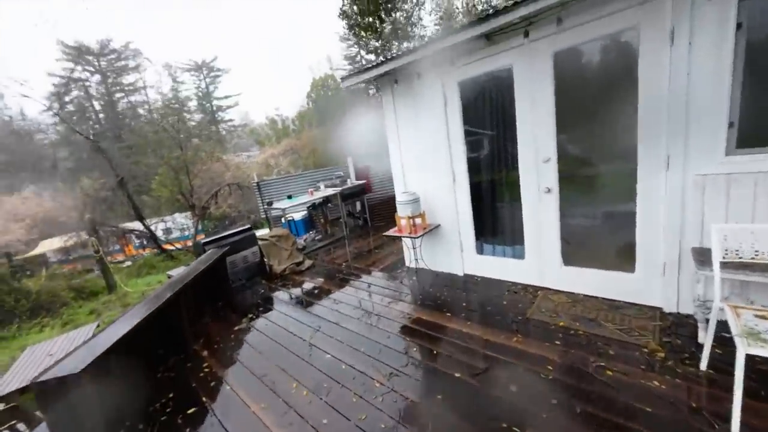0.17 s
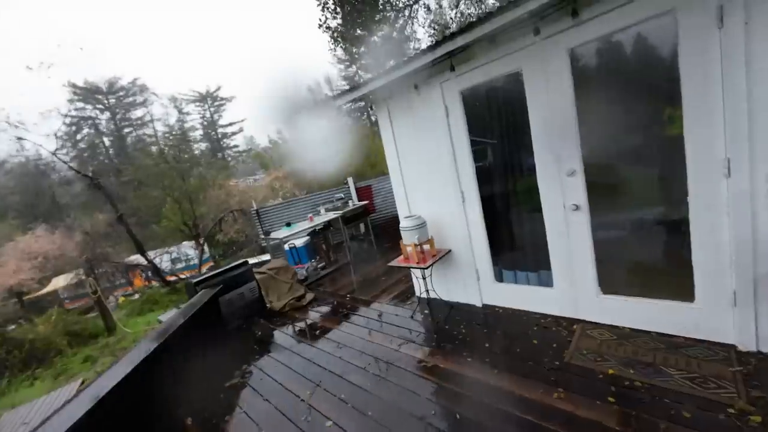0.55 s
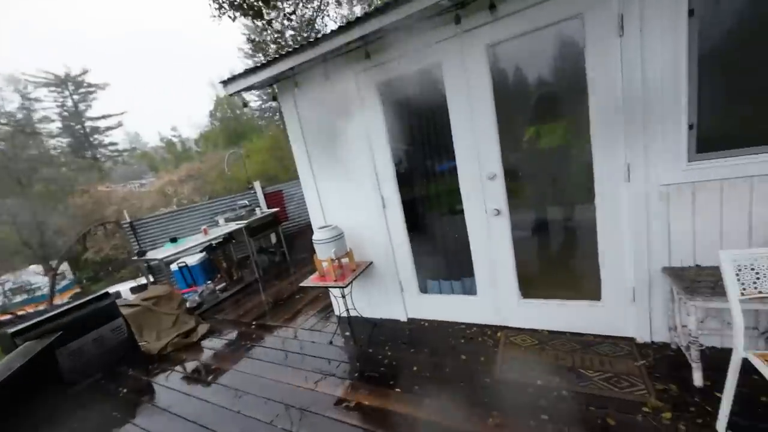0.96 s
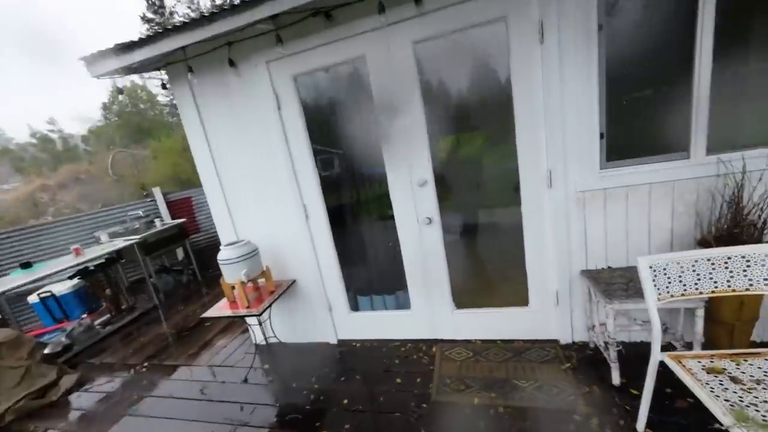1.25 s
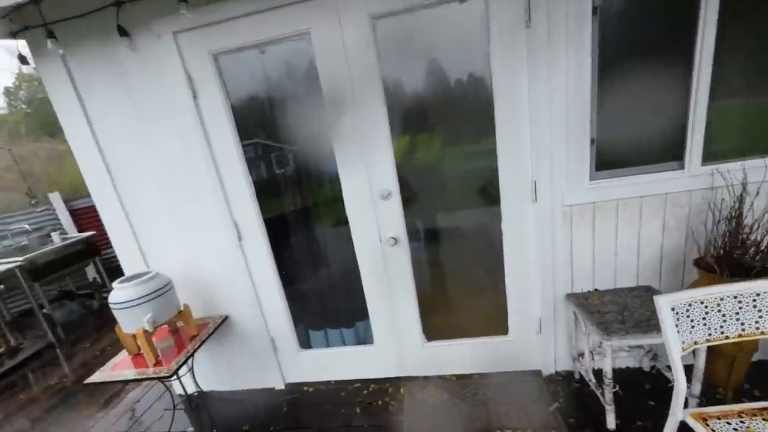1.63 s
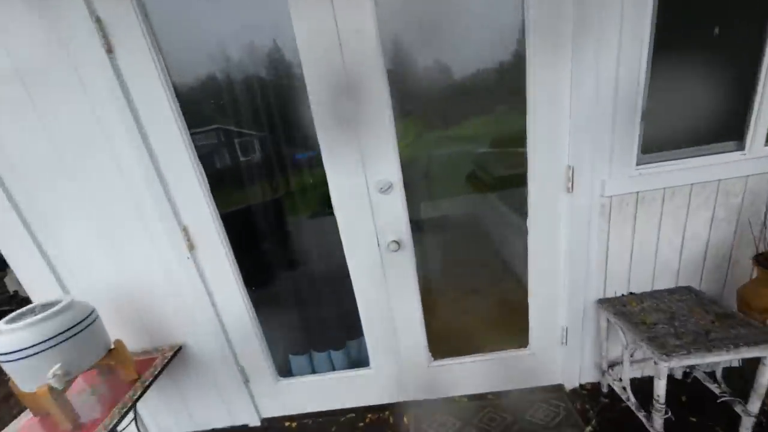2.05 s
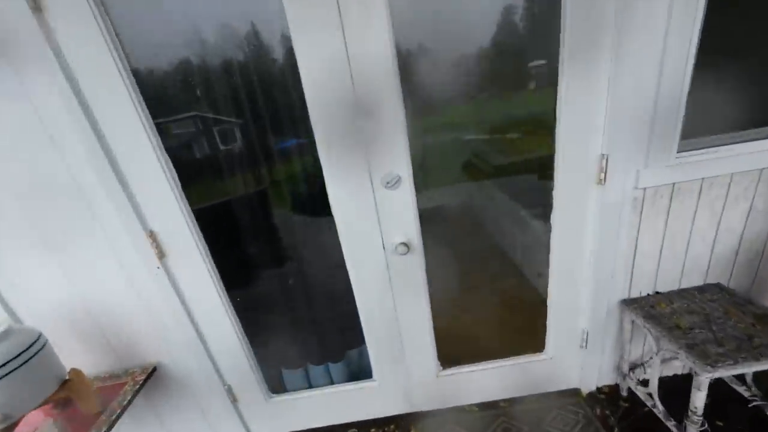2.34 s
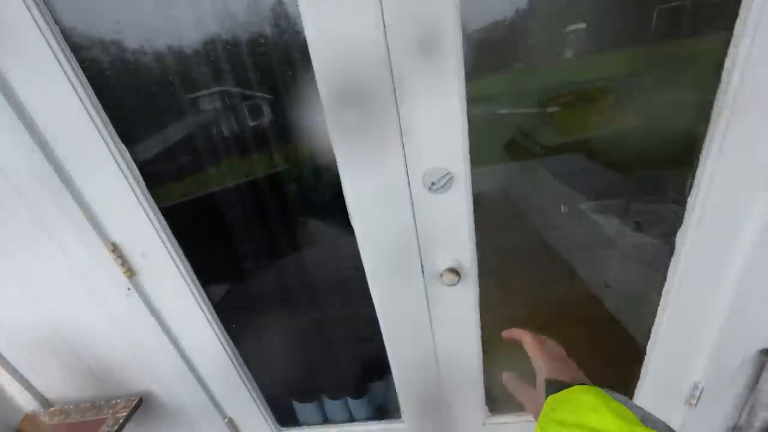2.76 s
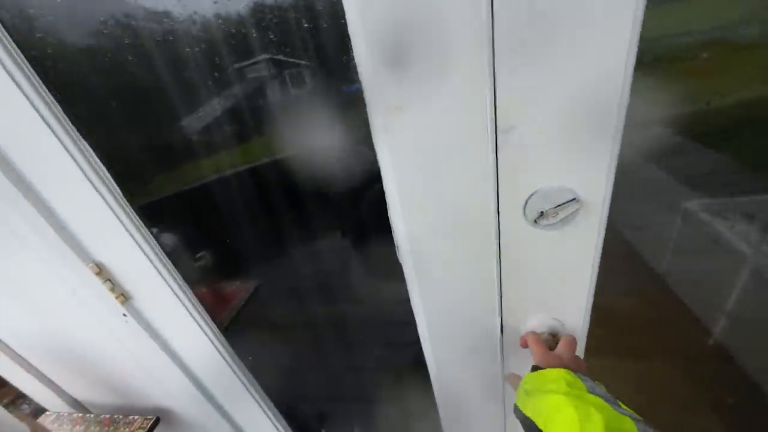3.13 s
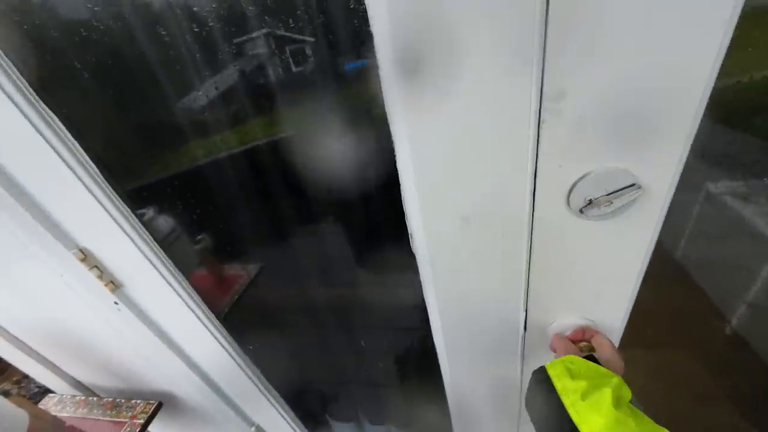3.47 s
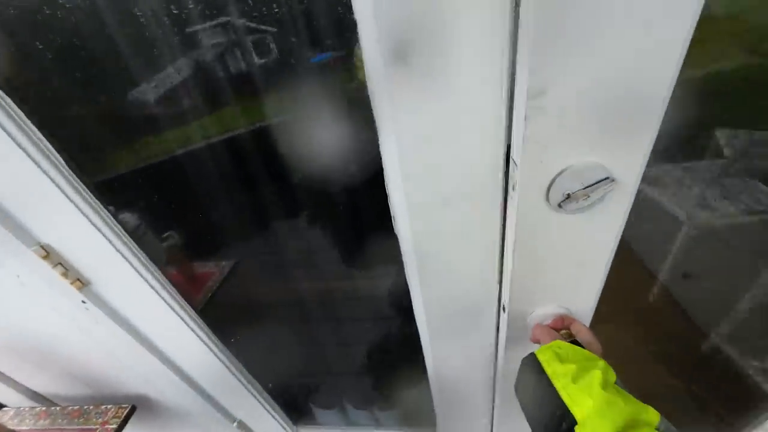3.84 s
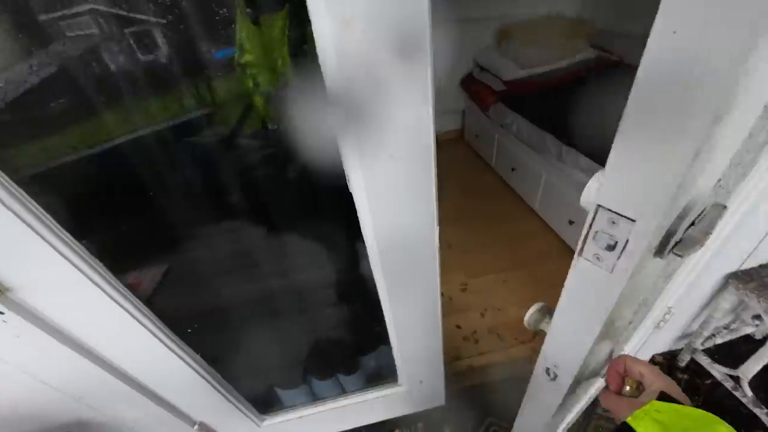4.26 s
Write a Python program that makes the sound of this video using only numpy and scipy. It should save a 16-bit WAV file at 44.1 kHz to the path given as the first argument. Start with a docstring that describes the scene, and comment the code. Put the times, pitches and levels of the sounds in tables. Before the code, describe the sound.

Outdoors on a wet wooden deck, steady rain hisses with splats and small plinks. A person in a wet jacket takes soft, low thumping steps, with brief sole scuffs and cloth rustle, while near drops tick. The knob and latch click, then a tight door judders from its frame. The carried, wet microphone sounds dull, with air rumble and rubbing at each step.

```python
"""Rain on a wooden deck, and a door

Steady rain hisses, splats and plinks: shaped noise, random impulses and short fading tones.
Someone walks over the wet boards to a door: struck tones thump, and swells of rough noise scuff and rustle.
Near drops tick, the knob and latch click, and the door rubs out of its frame in a run of uneven slips.
The microphone is wet and hears little treble; its air noise and rubbing mount are heard too.
"""
import sys
import numpy as np
from scipy import signal
from scipy.fft import rfft, irfft, next_fast_len
from scipy.io import wavfile
from scipy.ndimage import map_coordinates

SR = 44100
rng = np.random.default_rng(int(sys.argv[2]) if len(sys.argv) > 2 else 0)


def wrap_up_sound(samples):
    """Save the sound to the file named by the first command line argument, as 16-bit audio."""
    columns = np.atleast_2d(samples).T
    # keep every value between -1 and 1, then stretch to whole-number steps
    tamed = np.clip(columns, -1, 1)
    steps = np.round(tamed * 32767).astype(np.int16)
    wavfile.write(sys.argv[1], SR, steps)


N = 194084
TIME = np.arange(N) / SR  # seconds since the start
AGE = TIME[:SR // 3]  # seconds since a blow

# tone of drops on wet boards and of creasing cloth: f/Hz, level/dB
SWISH = [(300, -12), (900, -1), (1700, -6), (2400, -1.5), (3200, -1), (4200, -14.5), (6500, -33),
         (12000, -64.5), (16000, -92.5)]
# tone of short sounds through the wet microphone opening: f/Hz, level/dB
WET_PORT = [(30, -10), (300, 0), (3200, 6.5), (4200, 1), (6500, -25.5), (12000, -42), (16000, -57)]
# footfalls: t/s, level/dB, board pitch f/Hz, ring t60/s, knock level/dB (relative), knock pitch f/Hz
STEPS = [(.229, -22.5, 99, 0.065, -7, 201), (0.386, -27.5, 98, 0.078, -11, 218),
         (0.829, -24.5, 105, 0.14, -12.5, 235), (0.953, -36, 110, 0.098, -2.5, 234),
         (1.373, -38.5, 117, 0.025, -5, 257), (1.504, -36.5, 166, 0.06, -4, 333),
         (1.981, -27, 100, 0.057, -3, 256), (2.156, -21.5, 96, 0.059, -6.5, 244),
         (2.405, -38, 83, 0.19, -14, 260), (2.666, -22, 95.7, 0.086, -9, 228),
         (3.410, -22, 82, 0.06, -0.5, 238), (4.09, -26.5, 89, 0.11, -3.5, 249),
         (4.349, -24.5, 98.5, 0.052, -8, 204)]

PUSH_S, FREE_S, CLEAR_S = 4.097, 4.243, 4.272  # the door is pushed, breaks free, and clears its frame
SWING = np.clip((TIME - PUSH_S) / 0.15, 0, 1)  # speed of door and arm, 0-1, reached in 0.15 s


def amp(db):
    """Turn decibels into a gain."""
    return 10 ** (np.asarray(db) / 20)


def unit(x):
    """Scale to an average strength (rms) of 1."""
    return x / np.sqrt(np.mean(x ** 2) + 1e-20)


def crest(x):
    """Scale to a peak of 1."""
    return x / np.abs(x).max()


def along(points, hz):
    """Read between (Hz, value) points on a log pitch axis."""
    f, v = np.transpose(points)
    return np.interp(np.log(hz + 1), np.log(f + 1), v)


def wobble(rate):
    """A smooth random curve with rate knots a second."""
    knots = rng.standard_normal(int(N * rate / SR) + 4)
    return map_coordinates(knots, [TIME * rate])


def filtered(x, response):
    """Multiply the spectrum of x by a function of frequency."""
    m = next_fast_len(N + SR // 2)
    return irfft(rfft(x, m) * response(np.fft.rfftfreq(m, 1 / SR)), m)[:N]


def colour(x, spectrum):
    """Give x a tone from (Hz, dB) points, with a filter that never sounds before its input."""
    size = 8192
    gain = amp(along(spectrum, np.fft.rfftfreq(size, 1 / SR)))
    # folding the cepstrum moves the filter's whole response to after the input
    cepstrum = irfft(np.log(gain))
    cepstrum[1:size // 2] *= 2
    cepstrum[size // 2 + 1:] = 0
    return signal.fftconvolve(x, irfft(np.exp(rfft(cepstrum))))[:N]


def resonate(x, peaks):
    """Send x through (Hz, width Hz, dB) resonances and a soft contact that dulls the treble, at rms 1."""
    # tone of the soft contact: f/Hz, level/dB
    soft_contact = [(1500, 3.5), (3200, -4), (4500, -18), (8000, -35), (14000, -56)]

    def body(f):
        total = 0
        for k, (centre, width, db) in enumerate(peaks):
            resonance = 1j * f * width / (centre * centre - f * f + 1j * f * width)
            total = total + (-1) ** k * amp(db) * resonance  # neighbours have opposite signs
        return total

    return unit(colour(filtered(x, body), soft_contact))


def fade(t60):
    """Die away by 60 dB in t60 seconds."""
    return np.exp(-np.log(1000) * AGE / t60)


def ring(modes):
    """Strike (Hz, dB, t60) tones, a little different at each blow, and scale to peak 1."""
    total = 0
    for hz, db, t60 in modes:
        level = amp(db + rng.normal(0, 1))
        pitch = hz * (1 + rng.normal(0, .02))
        total = total + level * fade(t60) * np.sin(2 * np.pi * pitch * AGE)
    return crest(total)


def impacts(rate, spread_db):
    """Impulses of uneven size at random times, about rate a second, at rms 1."""
    size = amp(spread_db * np.minimum(rng.standard_normal(N), 2))
    hits = rng.random(N) < rate / SR
    return unit(hits * size * np.sign(rng.standard_normal(N)))


def add(track, s, sound):
    """Mix a sound into the track at s seconds."""
    part = track[round(s * SR):][:len(sound)]
    part += sound[:len(part)]  # part is a view, so the track changes too


def strokes(rows):
    """Bell-shaped swells from (s, dB, half length s) rows."""
    return sum(amp(db) * np.exp(-.5 * ((TIME - s) / half) ** 2) for s, db, half in rows)


def after(s):
    """A soft switch from 0 to 1 around s seconds, over a few milliseconds, so that the rubbing changes smoothly."""
    return .5 + .5 * np.tanh((TIME - s) / 0.002)


def patter(count, centre_hz, spread_db):
    """Drops at random times, each ringing a few cycles at its own pitch, at rms 1."""
    when, life = rng.random((2, count, 1))
    pitch, size = np.clip(rng.standard_normal((2, count, 1)), -2, 2)
    t = AGE[:SR // 50]
    cycles = centre_hz * np.exp(.45 * pitch) * t
    decay = np.exp(-cycles / (0.72 + 5 * life ** 2))
    grains = amp(spread_db * size) * np.sin(2 * np.pi * cycles) * decay
    where = (when * N).astype(int) + np.arange(len(t))
    track = np.bincount(where.ravel(), grains.ravel(), N)[:N]
    return unit(colour(track, WET_PORT))


def rain():
    """Far drops merge into a hiss; nearer ones splat on the wet boards and plink in the puddles."""
    # tone of the far rain: f/Hz, level/dB
    far_tone = [(30, -14), (100, 4), (400, -2.5), (650, -8), (1100, -7), (1900, -13.5), (2500, -8.5),
                (3250, -8), (4000, -19.5), (5000, -27), (6500, -36), (8200, -43), (10000, -50.5),
                (13000, -59)]
    far = unit(colour(rng.standard_normal(N), far_tone)) * amp(1.02 + 0.62 * wobble(9))
    falls = impacts(rate=750, spread_db=4.5)
    splats = unit(colour(falls, SWISH)) * amp(-4.5 + 0.8 * wobble(17))
    plinks = patter(count=1600, centre_hz=2372, spread_db=4) * amp(-6.5)
    drifting_gain = amp(-52 + 0.28 * wobble(2))
    return drifting_gain * (far + splats + plinks)


def jolts():
    """Each footfall shakes the carried microphone: a quick rise and a slower fall."""
    rise_s, fall_s = 0.024, 0.11  # time constants
    out = np.zeros(N)
    for s, db, *_ in STEPS:
        age = np.maximum(TIME - s, 0)
        out += amp(db) * (1 - np.exp(-age / rise_s)) * np.exp(-age / fall_s)
    return out


def handling():
    """Air rumbles at the microphone and its mount rubs, more after each footfall and as the door swings."""
    # tone of the moving air: f/Hz, level/dB
    rumble_tone = [(12, -14.5), (30, 3), (80, -1.5), (130, -8.5), (250, -20), (500, -34), (1500, -72),
                   (4000, -120)]
    # tone of the rubbing mount: f/Hz, level/dB
    rub_tone = [(80, -8), (200, 4.5), (500, 4), (900, -6.5), (1600, -13), (4000, -50.5), (10000, -120)]
    # puffs of air on the microphone: t/s, level/dB, half length/s
    puffs = [(.61, -46, 0.029), (1.33, -47, 0.017), (3.52, -41, .04), (3.9, -48.5, 0.15)]
    jolt = jolts()
    # each sum: being carried, shaken by footfalls, moved with the door
    air = amp(-54.5) + amp(-19.5) * jolt + amp(-38) * SWING + strokes(puffs)
    strain = amp(-59) + amp(-33) * jolt + amp(-45.5) * SWING
    rumble = air * amp(1.7 * wobble(14)) * unit(colour(rng.standard_normal(N), rumble_tone))
    rubbing = unit(colour(impacts(rate=900, spread_db=5.5), rub_tone))
    return rumble + strain * amp(2.3 * wobble(25)) * rubbing


def scuffs():
    """A rubber sole slips on the wet boards in short bursts, or drags dully over them."""
    # sole slips: t/s, level/dB
    slip_rows = [(0.218, -42.5), (0.258, -35), (.300, -34), (.310, -36.5), (0.425, -41.5), (.882, -43.5),
                 (0.927, -49)]
    # resonances of the sole: f/Hz, width/Hz, level/dB
    sole = [(258, 280, 3.5), (485, 320, 0), (770, 180, -6), (1253, 90, -0.5), (1580, 150, -10.5),
            (2650, 590, -16)]
    # dull scrapes on the boards: t/s, level/dB, half length/s
    scrapes = [(.266, -40.5, 0.012), (.293, -39, 0.0046), (.395, -43.5, 0.013), (.62, -55, 0.035),
               (1.93, -54, 0.046), (2.18, -47.5, 0.0078), (3.01, -46, 0.029), (3.485, -46, 0.023)]
    # resonances of the scraped boards: f/Hz, width/Hz, level/dB
    scrape_body = [(230, 250, -7.5), (422, 52, 5.5), (532, 27, 2.5), (647, 68, -3.5)]
    slip_half_s = 0.0053  # half length of a slip
    slip_swells = strokes([(s, db, slip_half_s) for s, db in slip_rows])
    slips = slip_swells * resonate(impacts(rate=1100, spread_db=2.0), sole)
    drags = strokes(scrapes) * resonate(impacts(rate=700, spread_db=-0.5), scrape_body)
    return slips + drags


def wall(x):
    """House wall and eaves answer briefly: noise that dies away at its own speed in each pitch band."""
    # fading of the answer: f/Hz, t60/s
    wall_fade = [(100, 0.24), (1000, 0.31), (8000, 0.25)]
    hz, t, bands = signal.stft(rng.standard_normal(SR // 3), SR, nperseg=256)
    decay = np.exp(-np.log(1000) * t / along(wall_fade, hz)[:, None])
    tail = signal.istft(bands * decay, SR, nperseg=256)[1]
    return signal.fftconvolve(x, tail / np.linalg.norm(tail))[:N]


def steps():
    """Each footfall bends a board, which swings at its own pitch and knocks in its upper modes."""
    # upper modes of a board: multiple of the knock pitch, level/dB, t60/s
    boards = [(0.602, -11.5, 0.13), (0.819, -5, 0.091), (0.999, 2.5, 0.059), (1.2, -12, 0.13),
              (1.7, -18, 0.065), (2.2, -17, 0.041)]
    out = np.zeros(N)
    for s, db, hz, t60, knock_db, knock_hz in STEPS:
        modes = [(ratio * knock_hz, level, life) for ratio, level, life in boards]
        swing_onset = 1 - np.exp(-(AGE / 0.0044) ** 2)
        swing = crest(-np.sin(2 * np.pi * hz * AGE) * fade(t60) * swing_onset)
        knock = crest(-ring(modes) * (1 - np.exp(-AGE / 0.006)))
        add(out, s, amp(db - 0.5) * (swing + amp(knock_db) * knock))
    return out


def clicks():
    """Hard taps on wood, and the knob and latch: a bright snap and the knock of the wood behind it."""
    # taps and clicks: t/s, level/dB, knock level/dB (relative)
    click_rows = [(0.358, -32, -18), (1.27, -43.5, 11), (1.700, -38.5, -2.5), (2.865, -37.5, 8.5),
                  (3.710, -34.5, -16), (3.793, -25, -2.5), (3.995, -40, 4), (4.134, -37, 5)]
    # modes of the bright snap: f/Hz, level/dB, t60/s
    metal = [(1150, -1, 0.0072), (1754, 7.5, 0.011), (2400, -6.5, 0.019), (2680, 3.5, 0.0088)]
    # modes of the wood: f/Hz, level/dB, t60/s
    wood = [(527, 3.6, 0.024), (756, 11.5, 0.0088), (970, 0.5, 0.021)]
    out = np.zeros(N)
    for s, db, knock_db in click_rows:
        crack = 0.37 * rng.standard_normal(len(AGE)) * fade(0.0074)
        add(out, s, amp(db) * (ring(metal) + crack + amp(knock_db) * ring(wood)))
    return colour(out, WET_PORT)


def spits():
    """The finest droplets spit right by the microphone: each is only a thin high tick of fading noise."""
    # droplets: t/s, level/dB (before a common trim), t60/s
    spit_rows = [(.382, -58, 0.075), (0.779, -53.5, 0.016), (0.84, -56, .03), (1.541, -57, 0.053),
                 (2.302, -53, 0.025), (2.526, -57.5, 0.032), (2.956, -54, 0.015)]
    # tone of the ticks: f/Hz, level/dB
    spit_tone = [(1000, -15), (5000, 16.5), (10000, -6), (13000, -19)]
    out = np.zeros(N)
    for s, db, t60 in spit_rows:
        add(out, s, amp(db - 8.5) * rng.standard_normal(len(AGE)) * fade(t60))
    return colour(out, spit_tone)


def jacket():
    """Wet cloth creases in many tiny crackles, swishing in strokes and as the arm follows the door."""
    # strokes of the cloth: t/s, level/dB, half length/s
    swishes = [(.41, -52, 0.077), (1.07, -47, 0.034), (1.765, -50.5, 0.024), (2.05, -53, 0.16),
               (2.485, -47.5, 0.012), (2.983, -49, 0.011), (3.17, -47, 0.012), (3.495, -47.5, 0.042),
               (4.07, -44.5, 0.0085), (4.32, -52, 0.0085), (4.39, -43.5, 0.015)]
    creases = impacts(rate=1800, spread_db=3)
    movement = strokes(swishes) + amp(-48.5) * SWING
    return movement * unit(colour(creases, SWISH))


def small_drops(count):
    """Lesser drops at random times, as rows of t/s, level/dB, f/Hz, spray level/dB (relative)."""
    rows = []
    for when, size, pitch in rng.random((count, 3)):
        level_db = -38.5 + 6 * (size - .5)
        hz = 2890 * np.exp(.4 * (pitch - .5))
        rows.append((when * TIME[-1], level_db, hz, -27.5))
    return rows


def drops():
    """A near drop slaps, rings for a few cycles round its pitch and throws a fine spray."""
    # the nearest drops: t/s, level/dB, f/Hz, spray level/dB (relative)
    near_drops = [(0.463, -34.5, 3170, -37), (0.7078, -32, 2320, -36), (0.956, -36, 3200, -28),
                  (1.299, -31, 2400, -25), (1.3361, -32, 2830, -31), (1.373, -36, 3240, -35),
                  (1.476, -33.5, 3000, -39), (1.7457, -36, 3280, -24), (2.0514, -33.5, 3380, -28),
                  (2.587, -33.5, 3530, -22.5), (2.8404, -36.5, 3210, -24), (2.9144, -37.5, 3150, -24),
                  (2.990, -33, 3020, -40), (3.033, -29, 2390, -30), (3.0619, -33, 2710, -37),
                  (3.461, -32.5, 3220, -22), (3.497, -29, 2770, -44), (3.514, -33, 2660, -42),
                  (3.867, -34, 2730, -39), (4.016, -35, 3020, -28)]
    slap_share = 0.36  # slap noise beside a ring of about 1
    ticks, sprays = np.zeros(N), np.zeros(N)
    for s, db, hz, spray_db in near_drops + small_drops(count=10):
        modes = [(.88 * hz, -5, .014), (hz, 0, .018), (1.17 * hz, -5, .012)]
        plink = ring(modes) * (1 - np.exp(-AGE / 0.00033))
        slap, spray = rng.standard_normal((2, len(AGE)))
        add(ticks, s, amp(db) * (plink + slap_share * slap * fade(0.022)))
        add(sprays, s, amp(db + spray_db) * spray * fade(0.069))
    spray_tone = [(1000, -21), (4500, 10.5), (7000, -1.0), (12000, -21)]  # f/Hz, level/dB
    return colour(ticks, WET_PORT) + colour(sprays, spray_tone)


def door():
    """The seal sticks and slips, shaking the panel; it lets go brightly, then sweeps the sill dully."""
    # lower resonances of the panel: f/Hz, width/Hz, level/dB
    door_low = [(125, 52, -3.5), (214, 35, -7), (302, 58, -7.5), (428, 35, -1), (501, 18, -1),
                (602, 57, -5)]
    # higher resonances of the panel: f/Hz, width/Hz, level/dB
    door_high = [(666, 28, 4), (750, 150, -5), (945, 63, -2.5), (1200, 110, -16.5), (1720, 280, -18.5)]
    stuck_db, loaded_db, sweep_db = -51, -37.5, -42  # first push, full load, sweeping the sill
    jump_db = 8  # the seal rubs this much harder as it lets go
    release_s, dulling_s = 0.0069, 0.0097  # how fast the rubbing stops, and how fast it turns dull
    load_bright, free_bright = 0.34, 0.92  # power share of the high modes, just before and at letting go

    load = np.clip((TIME - PUSH_S) / (FREE_S - PUSH_S), 0, 1) ** 1.5
    free = after(FREE_S)
    in_frame = after(PUSH_S) * np.exp(-np.maximum(TIME - CLEAR_S, 0) / release_s)
    seal = amp(stuck_db + (loaded_db - stuck_db) * load + jump_db * free) * in_frame
    level = seal + amp(sweep_db) * after(CLEAR_S)

    dulling = np.exp(-(np.maximum(TIME - FREE_S, 0) / dulling_s) ** 2)
    bright = np.clip(free * free_bright * dulling + (1 - free) * load_bright * load, 0, 1)

    slip_rate = 210 * np.exp(.4 * wobble(160))  # slips a second, uneven
    slip_count = np.floor(np.cumsum(slip_rate) / SR)
    slips = np.diff(slip_count, prepend=0) * amp(3.0 * wobble(300))
    low, high = resonate(slips, door_low), resonate(slips, door_high)
    grip = amp(1 * wobble(70))  # uneven along the frame
    return level * grip * (np.sqrt(1 - bright) * low + np.sqrt(bright) * high)


def scene():
    """Rain all round, with the walker's sounds, the near drops and the door close by."""
    close = scuffs() + steps() + clicks() + drops() + door()
    answer = amp(-13) * wall(close)
    return (close + answer + rain() + handling() + spits() + jacket())[None]


def record(dry):
    """Keep nothing at or above the band limit of 12750 Hz."""
    return filtered(dry[0], lambda hz: hz < 12750)[None]


dry = scene()
out = record(dry)
wrap_up_sound(out)
```